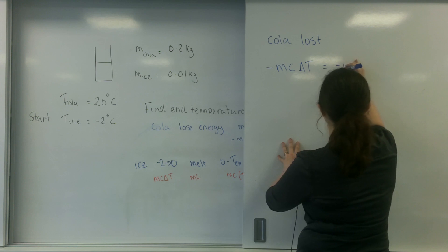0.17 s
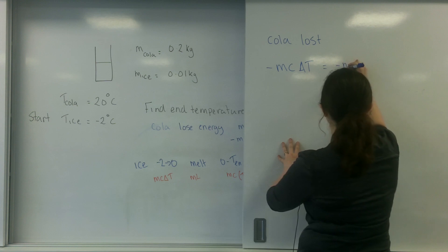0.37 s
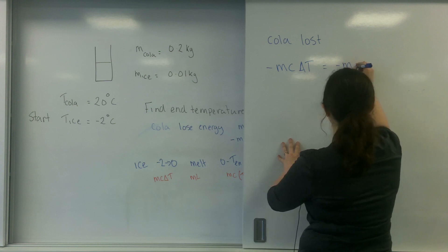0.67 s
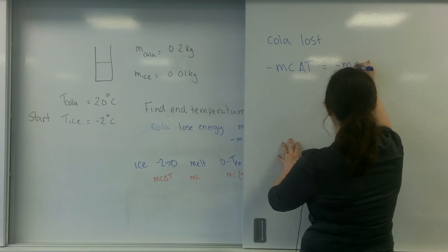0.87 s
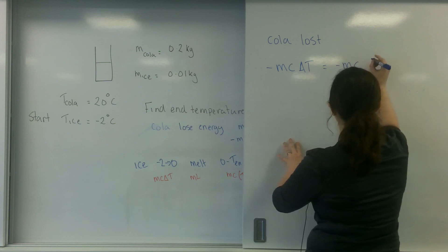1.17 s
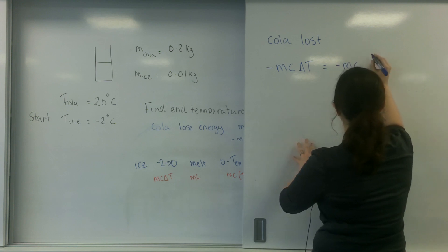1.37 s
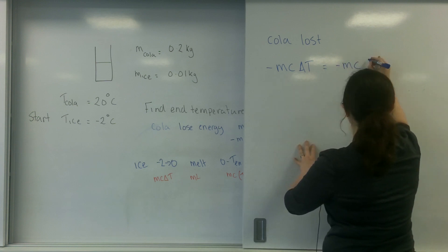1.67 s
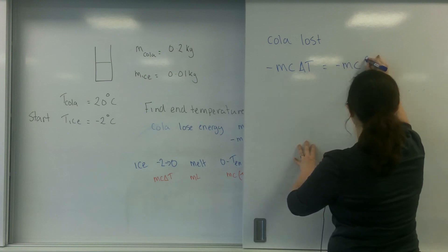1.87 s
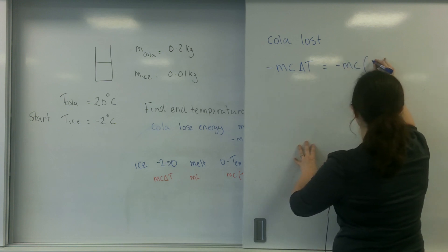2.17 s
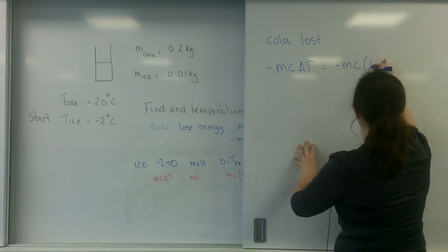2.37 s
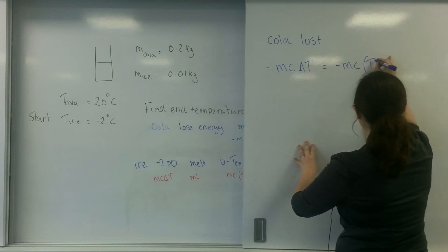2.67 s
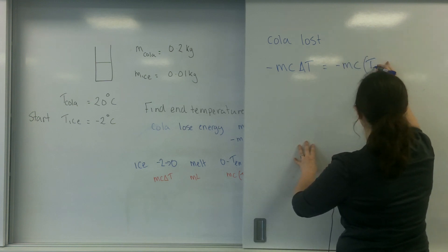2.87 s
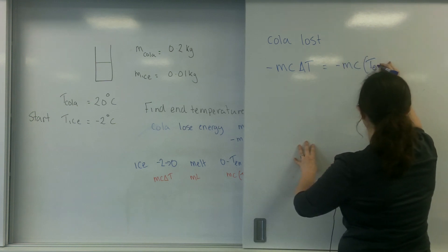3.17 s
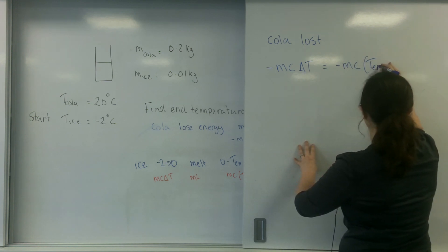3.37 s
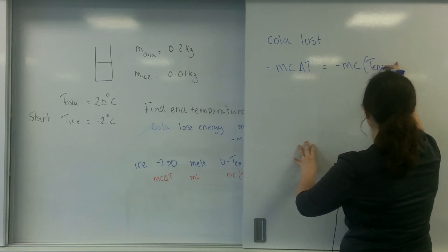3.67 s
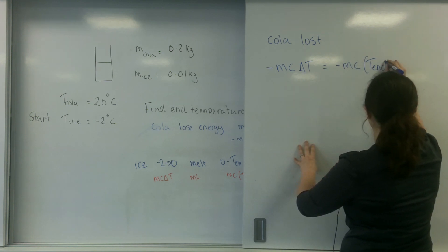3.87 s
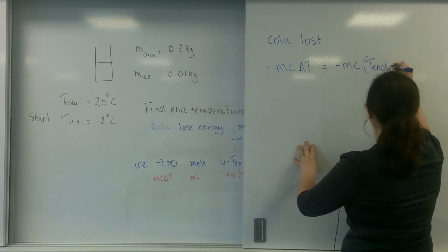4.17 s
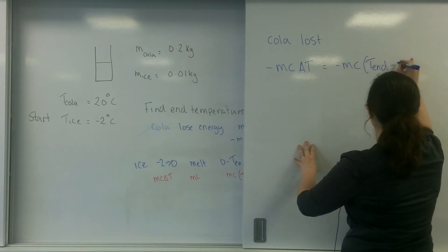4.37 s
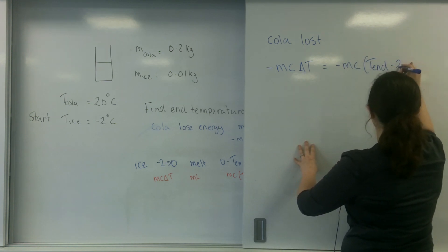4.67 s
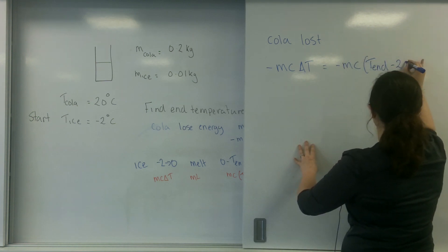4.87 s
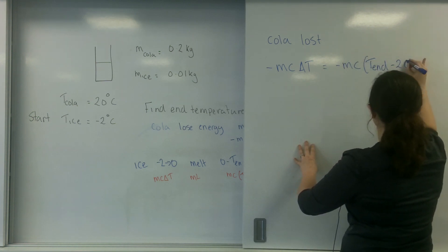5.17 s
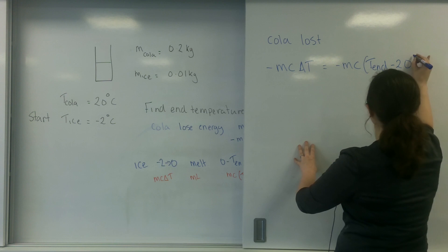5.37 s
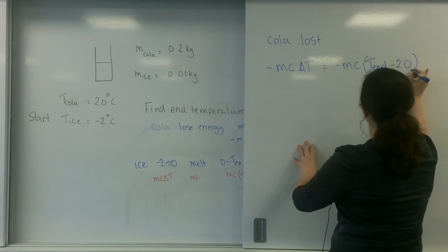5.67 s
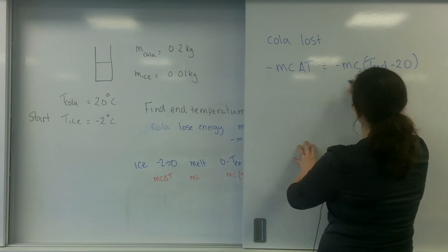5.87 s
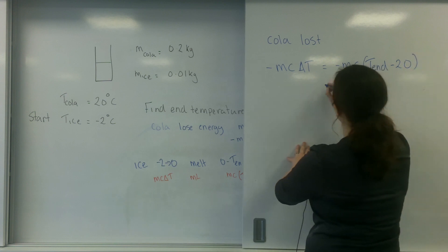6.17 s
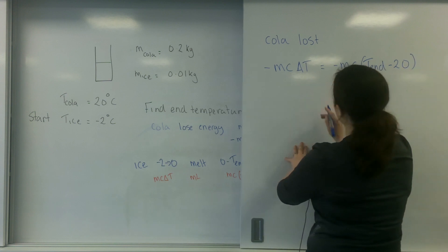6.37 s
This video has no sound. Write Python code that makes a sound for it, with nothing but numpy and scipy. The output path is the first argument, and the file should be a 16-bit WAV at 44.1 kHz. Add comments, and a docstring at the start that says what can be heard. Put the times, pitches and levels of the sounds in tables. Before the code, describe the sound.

A felt marker knocks and hisses in short strokes on a hollow-sounding classroom whiteboard, with clothing rubbing and crackling close to one microphone.

```python
"""A marker writes on a classroom whiteboard: its landings knock the panel into ringing modes and dense clatter,
and its felt tip hisses through each stroke, a rain of tiny slips that follows the pen speed.
Left: a microphone standing near the board. Right: a clip-on microphone on the writer, whose shirt rubs it
(filtered noise, slips and snapping folds) as the arm moves and as the writer turns at the end.
Clicks, soft swishes, diffuse classroom reflections and steady air noise complete the scene."""
import sys
import numpy as np
from scipy import signal
from scipy.fft import rfft, irfft
from scipy.io import wavfile

SR = 44100
rng = np.random.default_rng(int(sys.argv[2]) if len(sys.argv) > 2 else 0)


def generate_wav(signal):
    """Clip the signal to [-1, 1] and save it as 16-bit WAV at the path in sys.argv[1]."""
    frames = np.transpose(np.atleast_2d(signal))
    scaled = np.clip(frames, -1, 1) * 32767
    pcm = np.round(scaled).astype(np.int16)
    wavfile.write(sys.argv[1], SR, pcm)


N = 287664
CUTOFF_HZ = 14050


# marker landings: start_s, level_db (relative), hardness_hz, clatter_db (upper modes)
TAPS = [(0.0833, -26, 660, 3), (0.34, -25.5, 840, 4), (1.0287, -30.5, 557, 2.5), (2.0379, -36.5, 270, -8),
        (2.482, -23, 760, -1), (2.7804, -23.5, 560, -5), (3.0805, -25.5, 463, -2),
        (3.4552, -28.5, 484, 3.5), (3.8928, -30.5, 267, -9), (4.4449, -25.5, 600, 2.5),
        (4.681, -25, 540, 1.5), (5.143, -27.5, 500, 3), (5.6779, -28.5, 303, 0)]
REBOUND_S, REBOUND_WIDTH_S, REBOUND_DB = 0.024, 0.0048, -6   # the panel swings back against its frame


def tap_force(clatter_t60_s=0.16, tick_t60_s=0.012):
    """Each landing is a short push, briefer when harder; it also stirs upper modes too dense to tell apart."""
    force, clatter = np.zeros(N + SR), np.zeros((2, N + SR))
    t = np.arange(SR // 6) / SR
    dying = from_db(-60 * t / clatter_t60_s) + from_db(-60 * t / tick_t60_s)
    dying = dying + from_db(REBOUND_DB) * np.exp(-((t - REBOUND_S) / REBOUND_WIDTH_S) ** 2)
    for start_s, level_db, hardness_hz, clatter_db in TAPS:
        push = t * np.exp(-2 * np.pi * hardness_hz * t)
        softness = 1 + (230 / hardness_hz) ** 2   # a soft landing needs more momentum for the same thud
        push = from_db(level_db) * softness * push / push.sum()
        first = round(start_s * SR)
        at = slice(first, first + len(t))
        force[at] += push
        noise = rng.standard_normal((2, len(t))) * dying   # one row per microphone
        burst = signal.fftconvolve(noise, [push])[:, :len(t)]
        clatter[:, at] += from_db(clatter_db) * burst
    clatter = clatter[:, :N]
    # the panel shudders against its frame, differently after every landing
    shudder = from_db(3.5) * cut(clatter, [255, 370], "band")
    return force[:N], cut(clatter, [420, 1700], "band") + shudder


# panel modes: pitch_hz, t60_s, standing_db, clip_on_db (relative, per microphone)
BOARD = [(159.9, 0.38, -20, -24), (203, 0.15, -7, -9.5), (247, 0.042, -5.5, 4.5), (317, 0.014, -39.9, -1.5),
         (340.6, 0.28, -31, -22.5), (400.7, 0.1, -47, -12), (478, 0.2, -22, -15.5), (607, 0.23, -19.5, -26)]


def board(force, clatter, place_db=1.47):
    """The panel rings in its modes, each more or less as the pen moves over it; one signal per microphone."""
    force = cut(force, 93, "high")   # the panel hardly radiates its slowest bending
    knock = from_db(-16.0) * ring(force, hz=272, t60_s=0.03)   # the dead spot under the tip
    standing = knock + from_db(-7) * clatter[0]
    clip_on = from_db(-3.0) * clatter[1]
    for k, (pitch_hz, t60_s, standing_db, clip_on_db) in enumerate(BOARD):
        mode = ring(force * from_db(place_db * drift(1.0)), pitch_hz, t60_s)
        standing = standing + from_db(standing_db) * mode
        clip_on = clip_on + from_db(clip_on_db) * mode * (-1) ** k
    return -standing, -delay(clip_on, seconds=0.0014)


# pen strokes: fastest_s, length_s, level_db (relative)
STROKES = [(.412, 0.041, -64.5), (.52, 0.072, -66), (.625, 0.065, -70.5), (.74, 0.07, -66),
           (.853, 0.058, -68.5), (1.125, 0.066, -62.5), (1.2, 0.12, -70.5), (2.205, 0.14, -65.5),
           (2.555, 0.068, -69), (2.838, 0.065, -59.5), (3.152, .05, -64.5), (3.257, 0.037, -61.5),
           (3.51, .055, -68), (3.617, .075, -68), (3.712, 0.041, -71), (3.945, 0.056, -63.5),
           (4.051, 0.064, -59), (4.243, 0.077, -65), (4.482, .05, -67), (4.716, 0.034, -62.5),
           (4.836, 0.085, -60), (4.926, 0.042, -62), (5.228, 0.082, -69), (5.324, 0.059, -56),
           (5.42, 0.14, -69.5), (5.878, 0.15, -62.5)]


def pen_speed():
    """Each stroke is one swell of speed."""
    return movement(STROKES)


def pen_drag(speed):
    """A moving tip shakes the panel: low-passed noise follows its speed."""
    return from_db(-29.0) * speed * cut(rng.standard_normal(N), 500, "low")


# felt hiss spectrum: pitch_hz, density_db (per Hz, relative)
FELT_TIP = [(3000, -0.5), (4800, -13), (5700, -4.5), (6500, -7), (7200, -1), (7800, -3.5), (8700, 2.8),
            (9700, -0.5), (10800, 4), (12300, 0.5), (13700, -8.5)]


def felt_tip(speed, catch_db=3.0):
    """Felt fibres catch and slip on the glossy surface; ripples drift slowly through the hiss spectrum."""
    hiss = slips(per_s=9000, spread_db=-1.5) * from_db(catch_db * drift(110))
    copy_delay_s = .0009 * from_db(1.2 * drift(.7))   # a short, wandering delayed copy makes the ripples
    hiss = hiss + .6 * delay(hiss, copy_delay_s)
    speed = speed * from_db(1.0 * drift(30))   # the hand's pressure wavers
    return speed * cut(colour(hiss, FELT_TIP), 4300, "high", order=3)


# small clicks as the writer turns, marker in hand: start_s, peak_db (relative), bright_hz
CLICKS = [(5.968, -48, 1630), (5.982, -46, 700), (6.445, -55, 11000), (6.465, -56, 11000)]


def marker_clicks():
    """Short bursts of band-passed noise."""
    return crackles(CLICKS, decay_s=.003)


RUBS = [(-.04, 0.14, -47, -58.5, -73), (0.147, 0.14, -50, -54.5, -69), (1.187, 0.19, -70, -59, -73),
        (1.382, 0.22, -44.5, -43, -57), (1.608, 0.17, -38.5, -44, -57.5), (1.741, 0.14, -38.5, -37, -50.5),
        (1.944, 0.52, -49.5, -53.5, -65.5), (2.266, 0.091, -46, -44.5, -64), (2.447, 0.042, -47, -54, -64),
        (2.693, 0.11, -46, -52.5, -67.5), (2.85, .2, -55, -69, -90), (4.239, 0.02, -43, -56.5, -71),
        (4.947, 0.094, -47, -53.5, -66), (5.112, 0.14, -47.5, -49.5, -64), (5.236, 0.15, -48.5, -52.5, -64),
        (5.455, 0.26, -35, -44.5, -59.5), (5.777, 0.11, -55, -44.5, -55), (5.958, 0.091, -32.5, -36.5, -48),
        (6.075, 0.12, -32.5, -43.5, -58.5), (6.211, 0.21, -37.5, -42.5, -56), (6.49, 0.051, -45, -52, -60)]
GRIP_SHARE, RELAX_SHARE = 0.36, 0.54   # tightening ramp and relaxing decay, in shares of a rub's length
# the shirt never lies quite still
RESTING_TUG_DB, RESTING_RUB_DB, RESTING_FIBRE_DB = -56.5, -67.5, -77


def rubbing_db():
    """Tug, rub and fibre levels: each rub grips, slides evenly and relaxes; short ones are the most abrupt."""
    t = np.arange(N) / SR
    resting_db = [RESTING_TUG_DB, RESTING_RUB_DB, RESTING_FIBRE_DB]
    power = np.outer(from_db(resting_db) ** 2, np.ones(N))
    for start_s, length_s, *levels_db in RUBS:
        progress = (t - start_s) / length_s
        grip = np.clip(progress / GRIP_SHARE, 0, 1)
        relax = np.exp(-np.clip(progress - 1, 0, 10) / RELAX_SHARE)
        power += np.outer(from_db(levels_db) ** 2, (grip * relax) ** 2)
    return 10 * np.log10(power)


# cloth noise spectrum: pitch_hz, density_db (per Hz, relative)
CLOTH = [(25, 4), (55, -5.5), (120, -9.5), (200, -9), (330, -11), (500, -18), (750, -23), (1200, -26.5),
         (2000, -30), (3000, -35), (4700, -42), (6800, -41), (10000, -46), (13500, -49.5)]


def shirt(catch_db=1.0, flutter_db=1.0, lump_db=1.5):
    """Cloth on the microphone housing: slow tugs, dull bumps, the rasp of the weave, the hiss of fibres."""
    tug_db, rub_db, fibre_db = rubbing_db()
    catching = from_db(catch_db * drift(43))   # the cloth sticks and lets go
    tug = rms_one(cut(colour(rng.standard_normal(N), CLOTH), 114, "low", order=3))

    lumps = from_db(lump_db * drift(18.5))
    bumps = colour(slips(per_s=700, spread_db=2.0) * catching * lumps, CLOTH)
    bumps = rms_one(cut(cut(bumps, 123, "high"), 482, "low", order=3))

    flutter = from_db(flutter_db * drift(29))
    weave = colour(slips(per_s=6000, spread_db=1.5) * catching * flutter, CLOTH)
    weave = rms_one(cut(cut(weave, 434, "high", order=3), 3440, "low", order=4))

    fibres = colour(slips(per_s=9700, spread_db=3.0) * np.sqrt(catching), CLOTH)
    fibres = rms_one(cut(fibres, 3580, "high", order=4))

    bump_db = rub_db + 0.2 * (tug_db - rub_db) + 2.0   # taut cloth bumps harder
    low = from_db(tug_db + 2.5) * tug + from_db(bump_db) * bumps
    return low + from_db(rub_db) * weave + from_db(fibre_db + 0.65) * fibres


CREASES_PER_S, CREASE_OVER_RUB_DB, CREASE_SPREAD_DB, CREASE_HZ = 20, 6, 1, 1340


def creases():
    """Lesser folds let go at random, louder as the cloth rubs: start_s, peak_db, bright_hz."""
    rub_db = rubbing_db()[1]
    at = np.flatnonzero(rng.random(N) < CREASES_PER_S / SR)
    size, octaves = rng.standard_normal((len(at), 2)).T
    peak_db = rub_db[at] + CREASE_OVER_RUB_DB + CREASE_SPREAD_DB * size
    return zip(at / SR, peak_db, CREASE_HZ * 2 ** (.5 * octaves))


# folds of the shirt snapping over: start_s, peak_db, bright_hz
SNAPS = [(.168, -43, 1700), (.275, -42.5, 1850), (.31, -39.5, 1180), (2.0674, -43.5, 2500),
         (2.309, -50.5, 990), (2.9955, -48, 6000), (3.3205, -53, 1500), (3.3476, -47, 2400),
         (3.4039, -46, 1500), (4.2508, -43.5, 1090), (4.972, -41, 1000), (5.5295, -28, 1080),
         (5.7771, -31, 1000), (5.985, -28, 1290), (6.1303, -35, 6500), (6.249, -29.5, 1000),
         (6.303, -27, 1000)]


def shirt_folds():
    """Listed folds and random creases snap as very short noise bursts."""
    return crackles([*SNAPS, *creases()], decay_s=0.001)


# swishes of the writer's arm and body: fastest_s, length_s, level_db (before the high-pass)
SWISHES = [(.18, 0.3, -67), (1.9, 0.44, -69), (5.565, 0.17, -50.5), (6.0, 0.51, -59.5), (6.508, 0.06, -53)]
# swish spectrum: pitch_hz, density_db (per Hz, relative)
SLEEVE = [(280, -5), (400, 4), (550, -2), (700, -6), (900, -6), (1150, -21), (1500, -11), (1950, -5),
          (2500, -11.5), (3800, -23.4), (4800, -18), (6000, -27), (8000, -45)]


def swishes():
    """Soft cloth noise heard across the room swells with each movement."""
    return movement(SWISHES) * cut(colour(rng.standard_normal(N), SLEEVE), 220, "high")


# classroom reverberation: pitch_hz, t60_s
ROOM_T60 = [(100, 0.43), (250, 0.32), (700, 0.47), (2000, 0.32), (12000, 0.3)]


def classroom(x, build_s=0.0043):
    """Diffuse reflections build up and die away octave by octave, at about the power of the source."""
    t, response = np.arange(SR // 2) / SR, 0
    for low_hz in 55 * 2. ** np.arange(8):
        band = cut(rng.standard_normal(len(t)), [low_hz, 2 * low_hz], "band")
        t60_s = at_hz(ROOM_T60, low_hz * np.sqrt(2))
        band = band * from_db(-60 * t / t60_s) * (1 - np.exp(-(t / build_s) ** 2))
        response = response + band * np.sqrt(2 * low_hz / SR / np.sum(band ** 2))
    return signal.fftconvolve(x, response)[:N]


# background spectrum, standing microphone: pitch_hz, density_db (per Hz, relative)
ROOM_AIR = [(25, 4.5), (70, -2.5), (100, -12.5), (200, -10.5), (280, -16.5), (470, -20), (570, -21.5),
            (780, -24), (960, -22.5), (1200, -28.5), (2000, -31.5), (4000, -34), (8000, -38), (13500, -41)]
# background spectrum, clip-on microphone: pitch_hz, density_db (per Hz, relative)
CLIP_ON_AIR = [(25, -1), (60, -2.5), (120, -15.5), (210, -10.5), (300, -24), (450, -21), (700, -25.5),
               (2000, -30.5), (4000, -39), (8000, -45.5), (13500, -45.5)]


def air():
    """Steady coloured noise, independent at the two microphones."""
    standing = from_db(-58.0) * colour(rng.standard_normal(N), ROOM_AIR)
    clip_on = from_db(-56.0) * colour(rng.standard_normal(N), CLIP_ON_AIR)
    return standing, clip_on


SPEEDING_UP_SHARE = .6   # a movement gathers speed for this share of its length, then brakes


def movement(table):
    """Friction follows speed: one smooth swell per movement, its length between the 1/e amplitude points."""
    t, power = np.arange(N) / SR, np.zeros(N)
    for fastest_s, length_s, level_db in table:
        near = np.abs(t - fastest_s) < 2 * length_s
        share = np.where(t[near] < fastest_s, SPEEDING_UP_SHARE, 1 - SPEEDING_UP_SHARE)
        u = (t[near] - fastest_s) / (length_s * share)
        power[near] += from_db(level_db) ** 2 * np.exp(-2 * u * u)
    return np.sqrt(power)


def crackles(table, decay_s):
    """Tiny dry bursts, each with a brightness of its own."""
    out, t = np.zeros(N + SR), np.arange(SR // 40) / SR
    for start_s, peak_db, bright_hz in table:
        burst = rng.standard_normal(len(t)) * np.exp(-t / decay_s)
        burst = cut(burst, [bright_hz / 2, bright_hz * np.sqrt(2)], "band")
        out[round(start_s * SR):][:len(t)] += from_db(peak_db) * burst / np.abs(burst).max()
    return out[:N]


def slips(per_s, spread_db):
    """Friction: a dense rain of tiny slips of uneven size; rms 1."""
    size_db = spread_db * np.minimum(rng.exponential(1, N), 4)
    sizes = from_db(size_db) * rng.choice([-1, 1], N)
    return rms_one(sizes * (rng.random(N) < per_s / SR))


def ring(x, hz, t60_s):
    """A unit click sets a cosine of height 1 ringing; the lowest frequencies pass only weakly."""
    r, w = from_db(-60 / (t60_s * SR)), 2 * np.pi * hz / SR
    return signal.lfilter([.5, 0, -.5 * r * r], [1, -2 * r * np.cos(w), r * r], x + 1e-18)


def drift(rate_hz):
    """Smoothed chance with spread 1, drawn at every 40th sample."""
    r = np.exp(-80 * np.pi * rate_hz / SR)
    noise = rng.standard_normal(N // 40 + 2002)
    slow = signal.lfilter([1], [1, -2 * r, r * r], noise)[2000:]   # settled part
    return np.interp(np.arange(N) / 40, np.arange(len(slow)), rms_one(slow))


def delay(x, seconds):
    """Shift later by a fixed or varying time."""
    return np.interp(np.arange(N) - seconds * SR, np.arange(N), x, left=0)


def colour(x, spectrum):
    """Shape noise by a spectrum; rms 1."""
    hz = np.arange(N // 2 + 1) * SR / N
    gain = from_db(at_hz(spectrum, hz)) * (hz > 15) * (hz < CUTOFF_HZ)
    return rms_one(irfft(rfft(x) * gain, N))


def cut(x, hz, kind, order=2):
    """Butterworth filter."""
    hz = np.clip(hz, 10, .45 * SR)
    return signal.sosfilt(signal.butter(order, hz, kind, fs=SR, output="sos"), x)


def at_hz(points, hz):
    """Read a table against frequency on a log axis."""
    points = np.array(points)
    return np.interp(np.log(np.maximum(hz, 1)), np.log(points[:, 0]), points[:, 1])


def rms_one(x):
    """Scale to unit rms."""
    return x / np.sqrt(np.mean(x ** 2) + 1e-20)


def from_db(db):
    """Decibels to gain."""
    return 10 ** (np.asarray(db) / 20)


def scene():
    speed = pen_speed()
    force, clatter = tap_force()
    panel, panel_close = board(force + pen_drag(speed), clatter)
    tip = felt_tip(speed) + marker_clicks()
    cloth = shirt() + shirt_folds()
    standing_air, clip_on_air = air()

    standing = panel + from_db(-8) * classroom(panel)
    standing = standing + from_db(4.0) * tip + from_db(-7.5) * classroom(tip)
    standing = standing + swishes() + standing_air

    clip_on = panel_close + from_db(-8.5) * classroom(panel_close)
    clip_on = clip_on + from_db(-29) * tip + cloth + clip_on_air
    return np.array([standing, clip_on])


def record(dry):
    """The top is cut steeply by an elliptic low-pass."""
    return signal.sosfilt(signal.ellip(12, .2, 80, CUTOFF_HZ, fs=SR, output="sos"), dry)


dry = scene()
out = record(dry)
generate_wav(out)
```